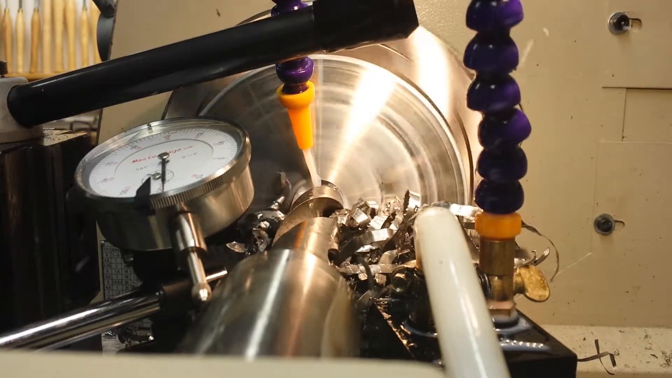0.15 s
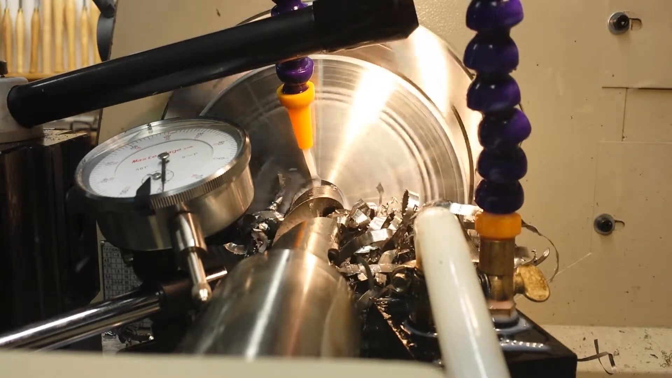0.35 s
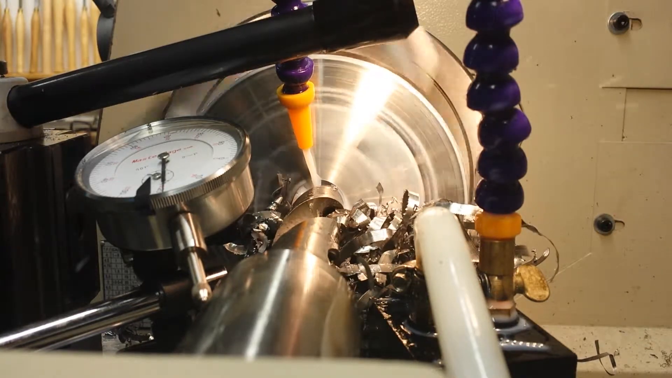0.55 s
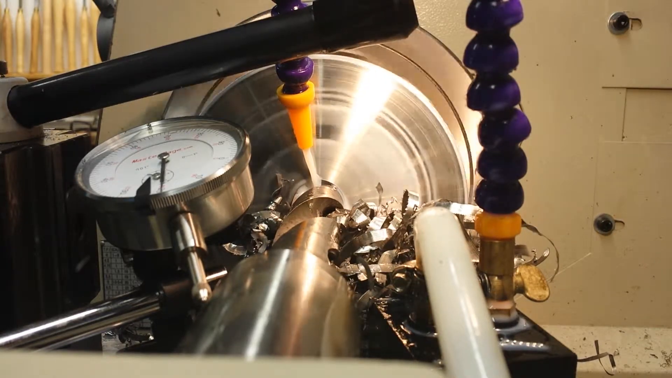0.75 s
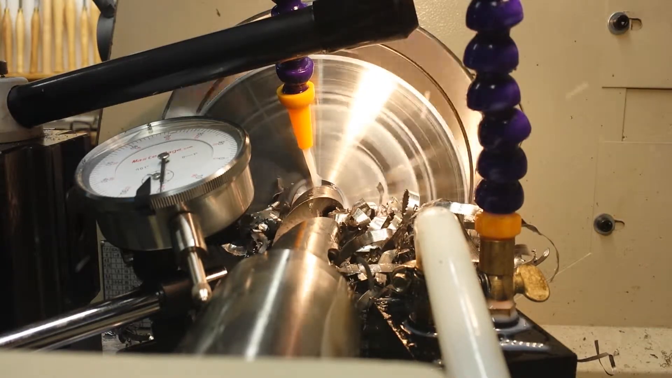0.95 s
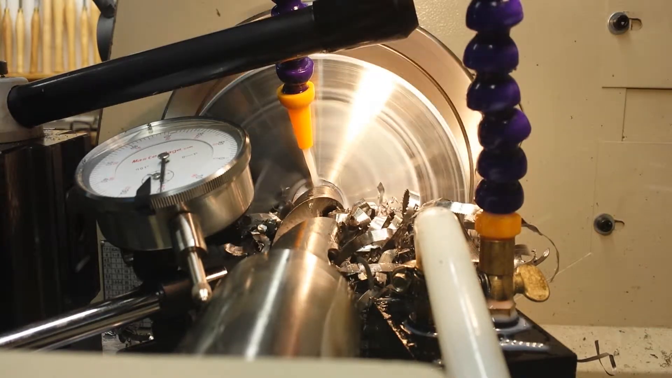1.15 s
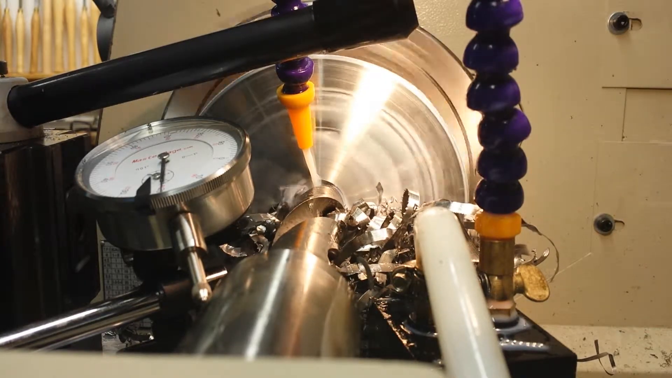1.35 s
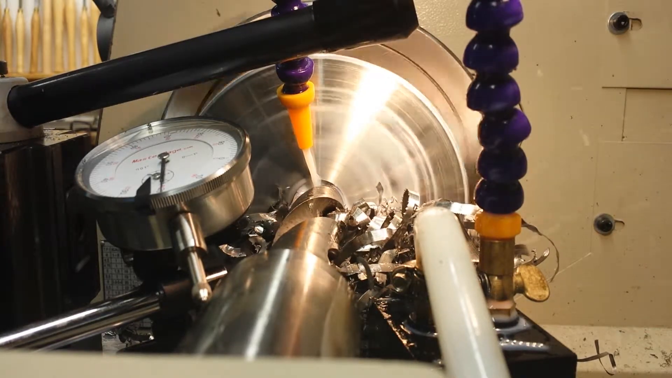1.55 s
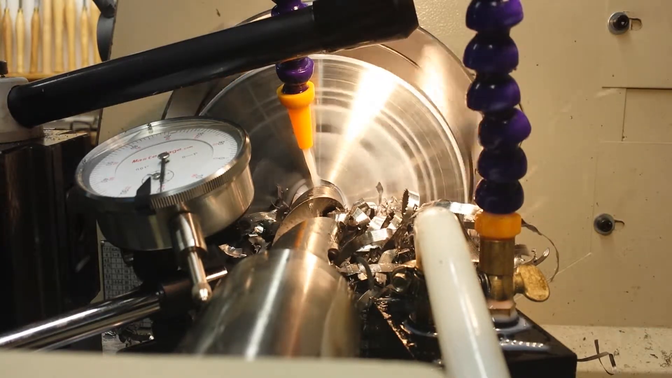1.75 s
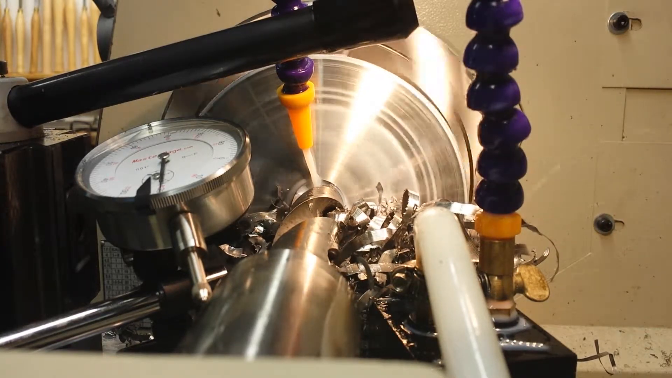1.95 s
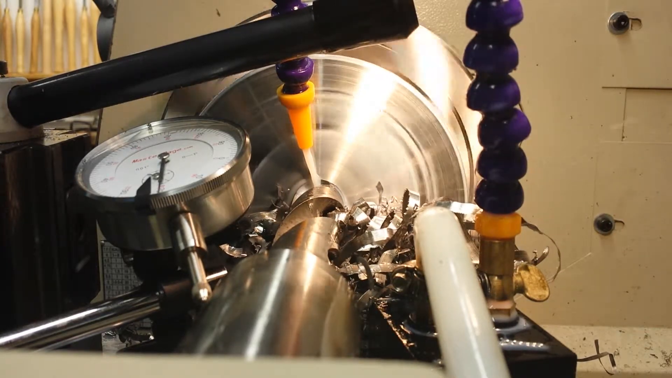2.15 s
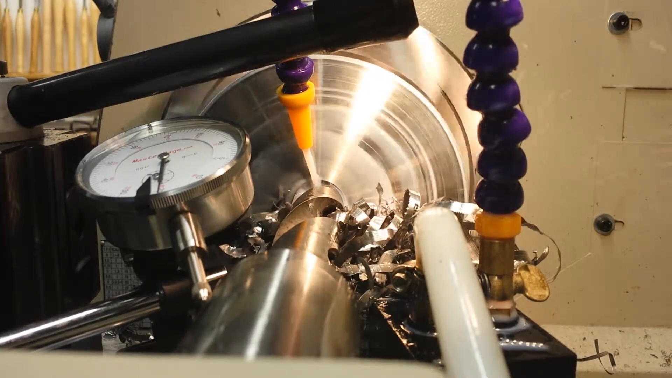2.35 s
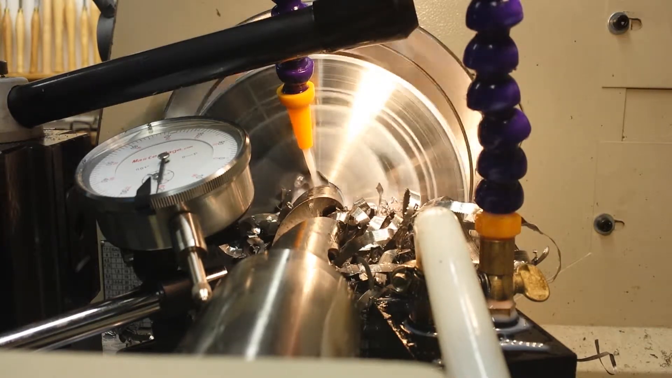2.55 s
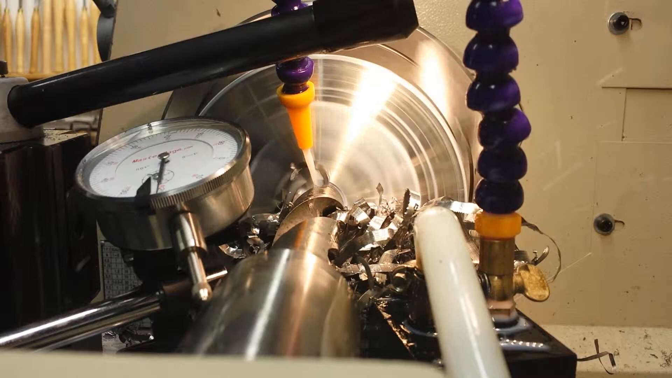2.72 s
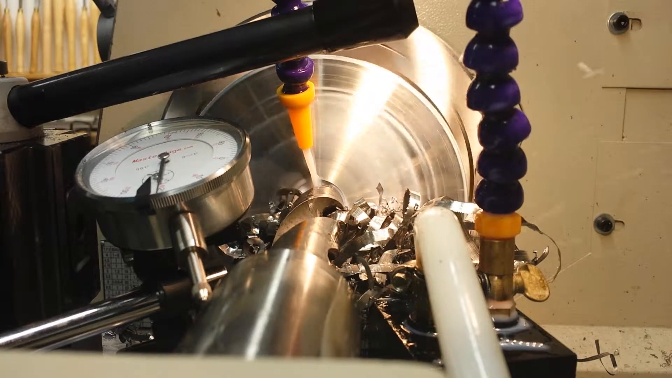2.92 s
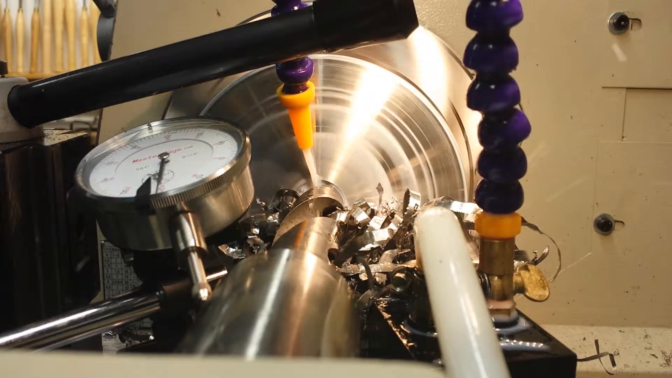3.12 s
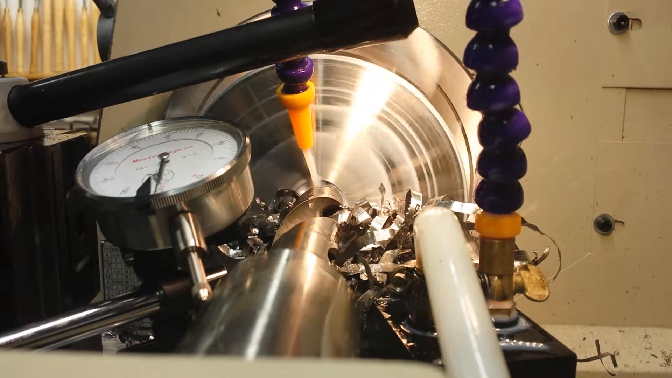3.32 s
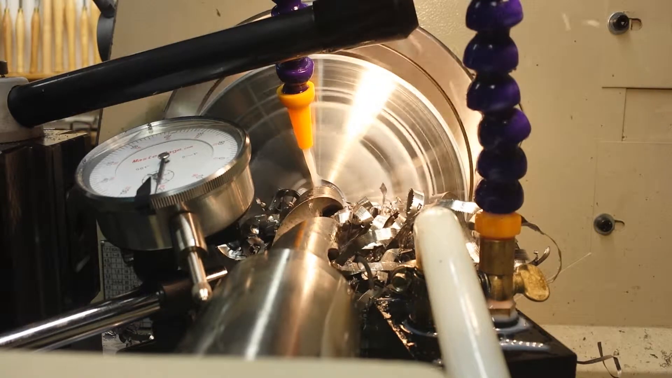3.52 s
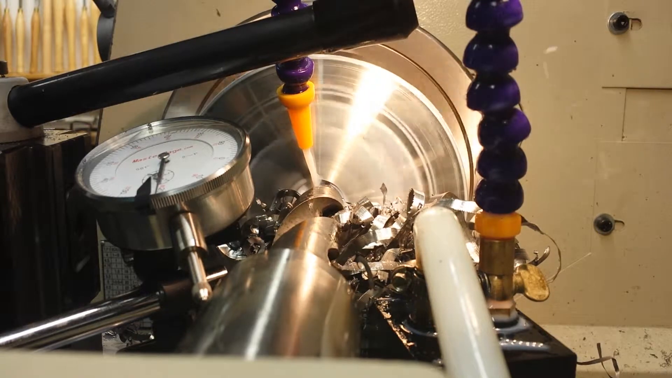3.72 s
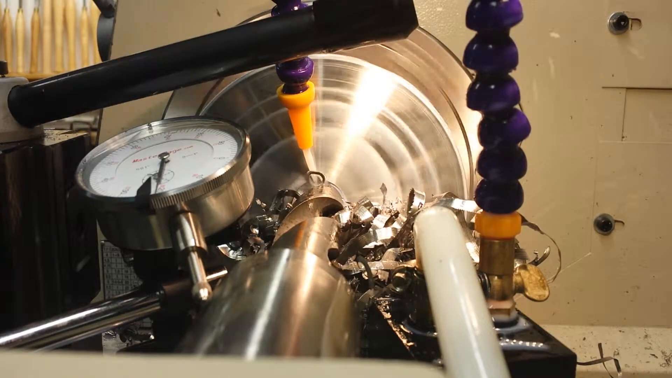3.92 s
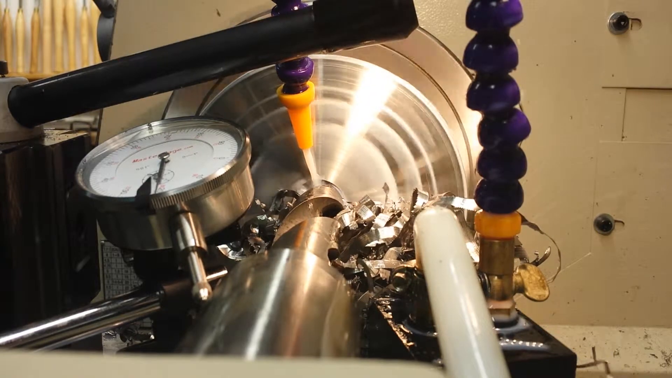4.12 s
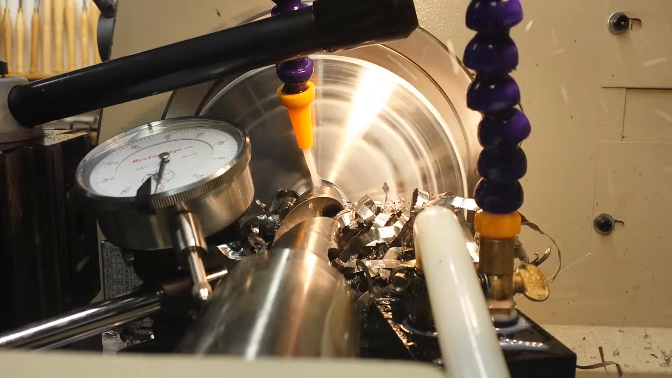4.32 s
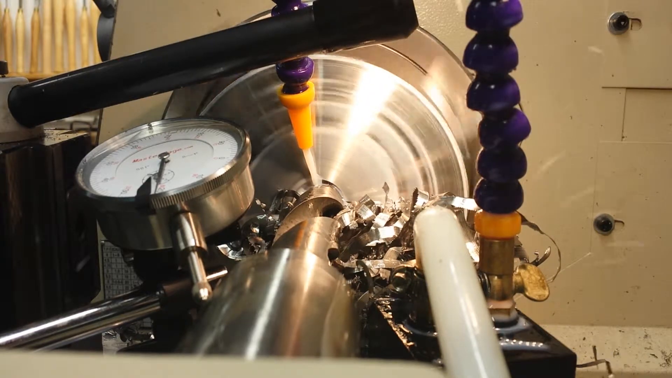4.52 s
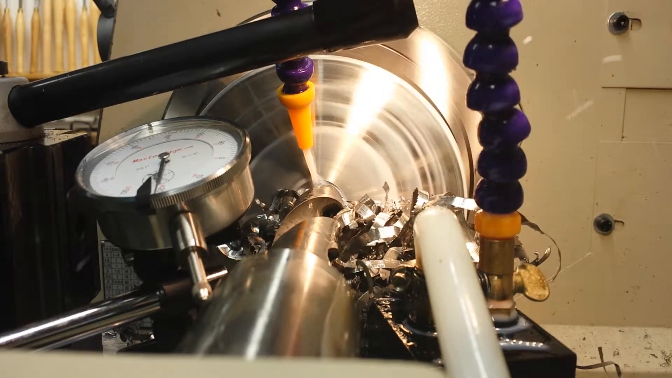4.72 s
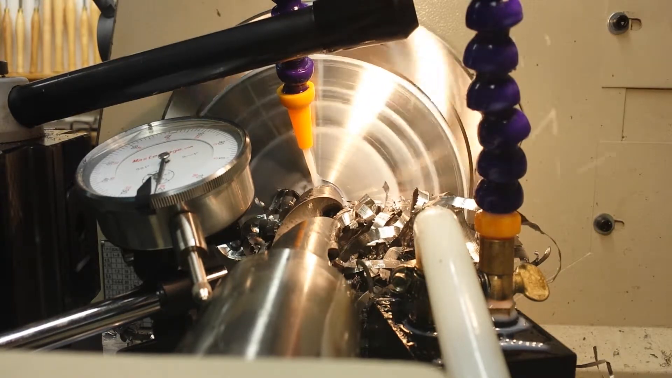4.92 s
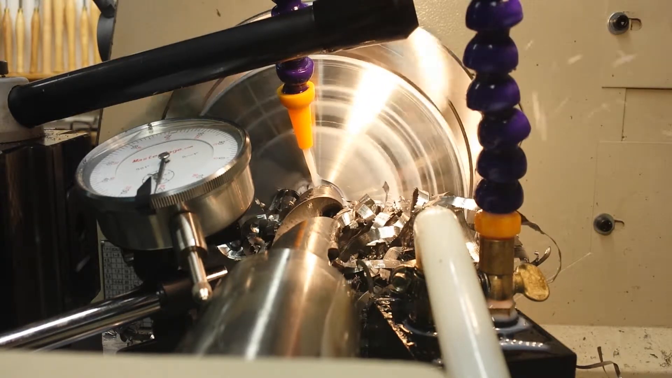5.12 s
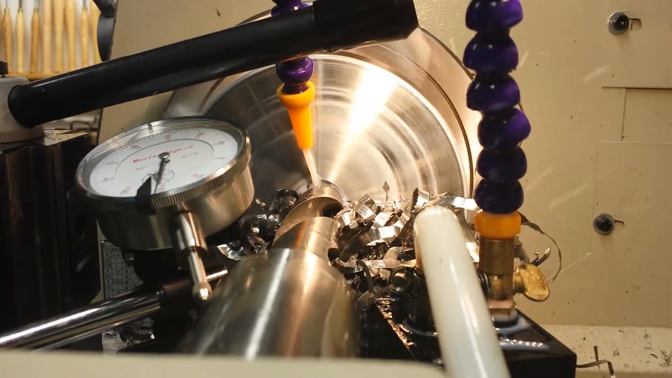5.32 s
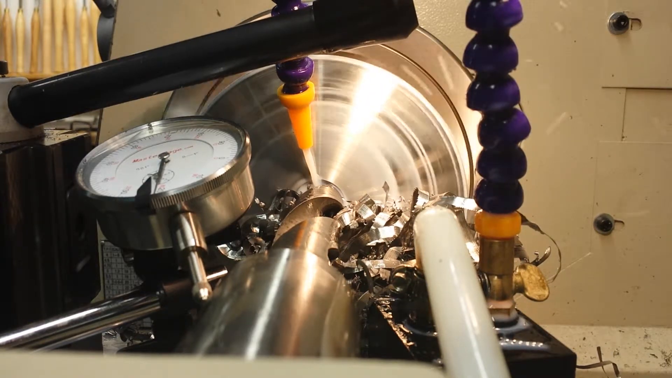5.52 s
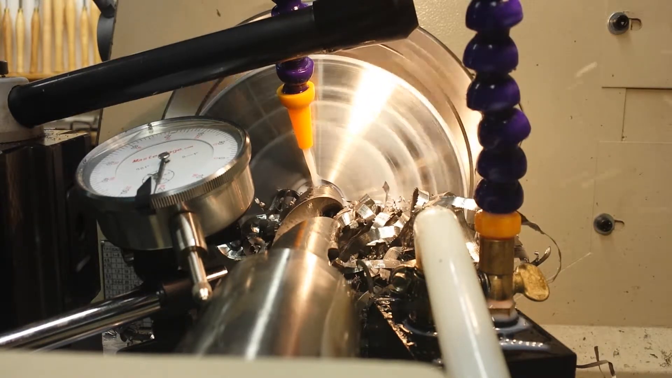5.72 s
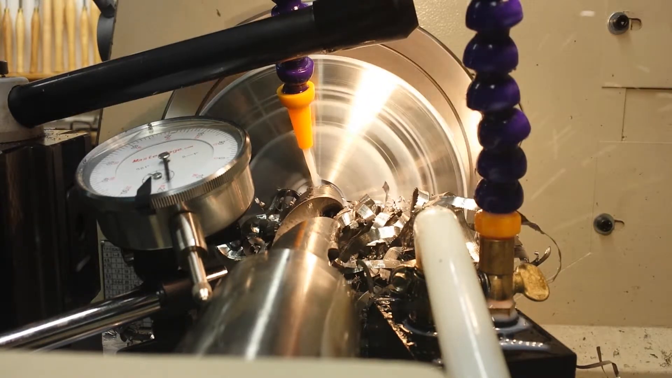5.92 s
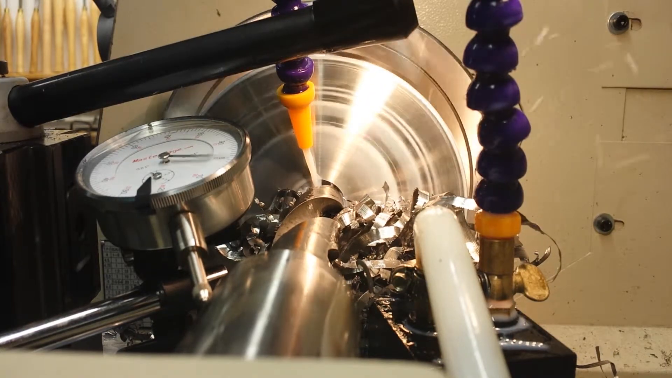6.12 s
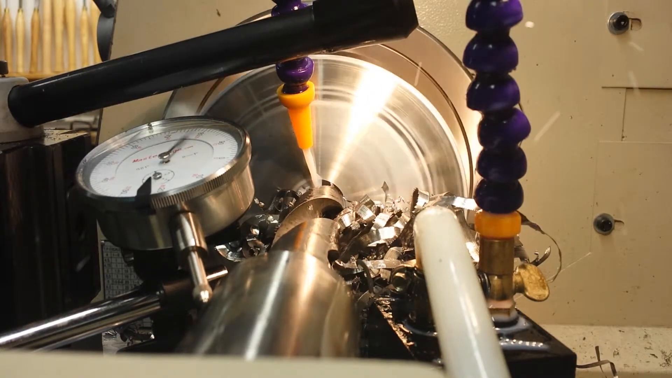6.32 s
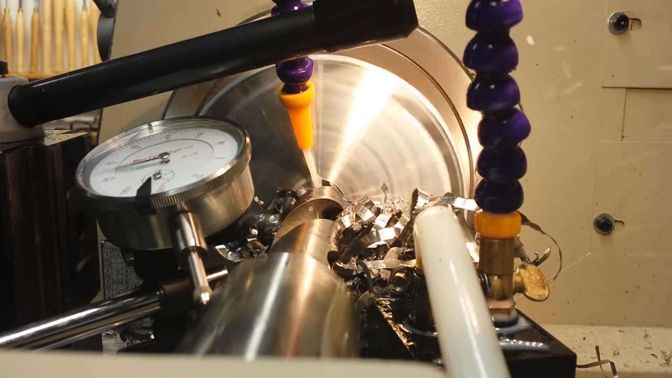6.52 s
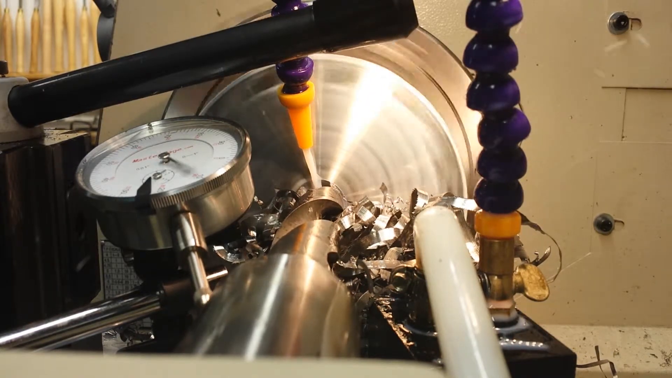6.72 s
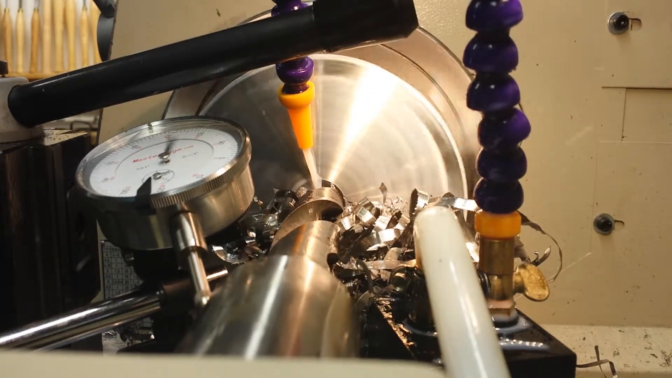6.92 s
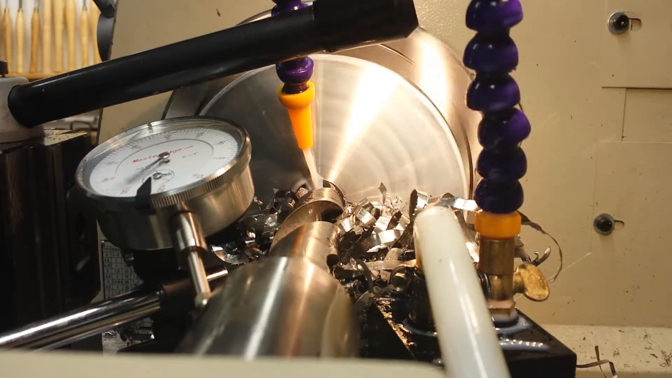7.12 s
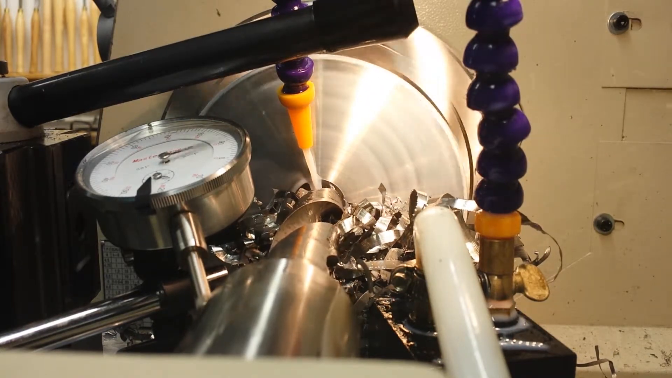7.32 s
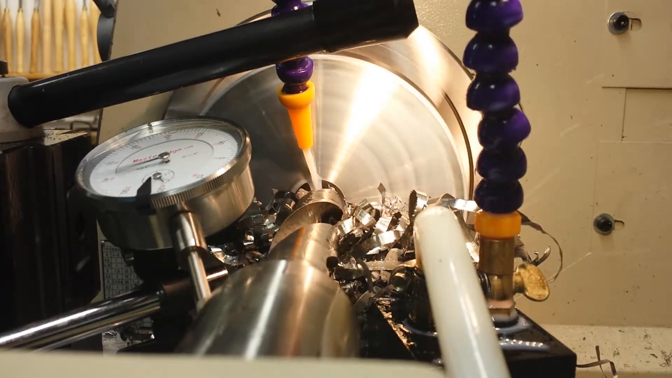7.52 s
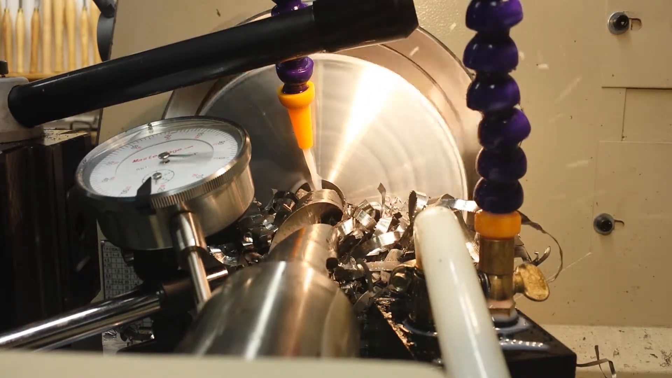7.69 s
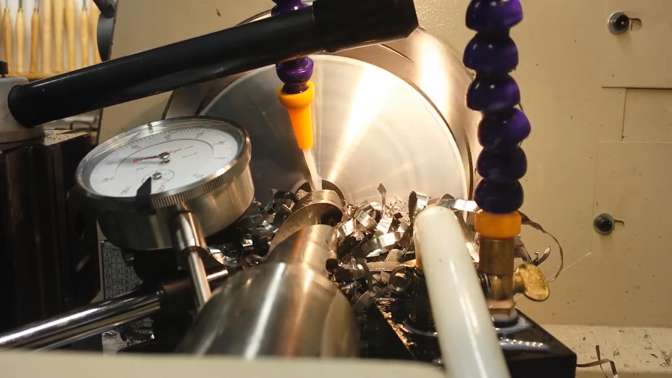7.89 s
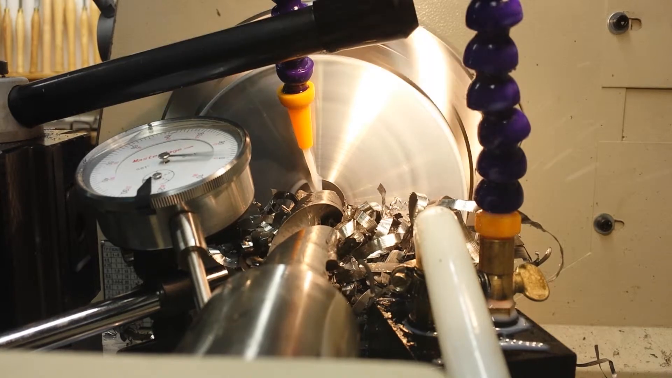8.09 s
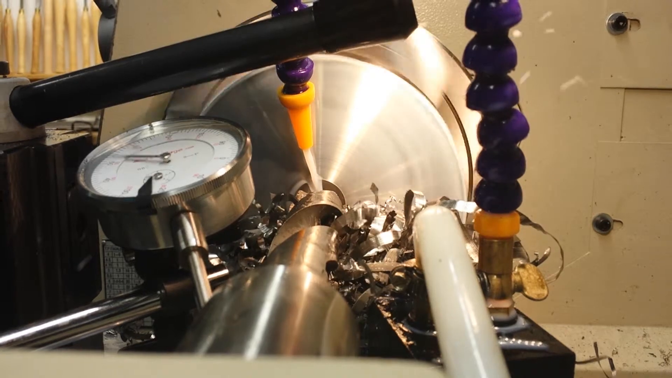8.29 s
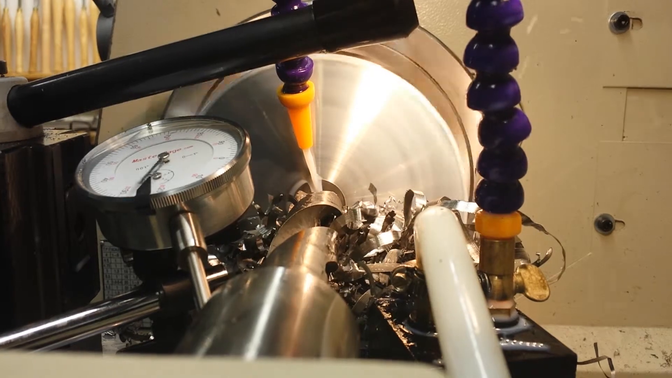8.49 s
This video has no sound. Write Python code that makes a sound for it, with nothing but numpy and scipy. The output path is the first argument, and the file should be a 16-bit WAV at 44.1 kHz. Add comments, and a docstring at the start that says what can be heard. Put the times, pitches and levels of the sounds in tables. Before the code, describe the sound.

A painfully shrill, fluttering drill screech with brief dropouts ends abruptly near six seconds; spraying coolant, low gear hum and small metallic ticks rise afterwards.

```python
"""A lathe drills steel under coolant, with two microphones close by. From the start the drill squeals near
7.5 kHz, as one steered sine that stalls and snaps back, over a cutting hiss and a low swelling rumble of noise.
The squeal is so loud that it overloads the microphones' input and pushes everything else down.
Near 6 s the feed stops and squeal and hiss end. The gain control then brings up the hum of motor and gears
(sines and noise) and the rush of coolant. Loose chips tick as decaying rings, and one long chip scrapes."""
import sys
import numpy as np
from scipy import signal
from scipy.fft import rfft, irfft, next_fast_len
from scipy.io import wavfile
from scipy.ndimage import uniform_filter1d, map_coordinates

SR = 44100
rng = np.random.default_rng(int(sys.argv[2]) if len(sys.argv) > 2 else 0)


def transcribe(u):
    """Save the signal u as a 16-bit wav file named by the first command-line argument.

    u: samples, shape (n,) or (channels, n), limited to [-1, 1]; the rate is SR.
    q: integer samples, one column per channel.
    """
    v = np.clip(np.atleast_2d(u).T, -1, 1)
    q = np.round(v * 32767).astype(np.int16)
    wavfile.write(sys.argv[1], SR, q)


N = 377055  # length in samples

# The two microphones. Each row: frequency in Hz, likeness of left and right (1 same, 0 unrelated, -1 opposite).
LIKENESS = [(60, -0.39), (130, 1), (290, 0.68), (640, 0.48), (1400, -0.1), (3070, 0.18), (6750, -0.088),
            (14800, 0.3)]
# Each row: frequency in Hz, left minus right level in dB.
LEFT_MINUS_RIGHT = [(60, -17), (110, -2), (200, 0), (380, 1.5), (690, -4), (1280, -1.5), (2360, -2.5),
                    (4360, -2), (8040, -7.5), (14800, -20.5)]

# How strong the squeal is when it is not stalled. Each row: time in seconds, level at the right
# microphone in dB, left minus right level in dB, phase between the microphones in radians.
SQUEAL_LEVEL = [(0, 5.5, -15, 3.86), (.7, 4, -10, 3), (.8, 9.5, -10, 3.88), (1.2, 6.5, -14.5, 3.4),
                (1.35, 10, -8.5, 4.57), (1.5, 0, -6, 3.9), (1.9, 5.5, -12.5, 3.4), (2.1, 2, -6, 3.04),
                (2.3, 6.5, -8.5, 3.05), (2.65, 3.5, -5, 3.22), (3.05, 4, -5.5, 2.27), (3.28, 6.5, -6, 3.75),
                (3.41, 5, -2, 2.06), (3.55, 3.5, -7, 2.63), (4.2, 5, 0, 3.02), (4.3, 12, -2.5, 1.84),
                (4.4, 7.5, -4.5, 2.4), (4.48, 4.5, -7.5, 3), (4.6, 4, -11, 2.2), (4.68, 6, -15.5, 6.4),
                (4.78, 6, -7.5, 2.73), (5.05, 4, -8.5, 3.3), (5.48, 4, -9, 3.63), (5.72, -5, -4, 2.76),
                (5.83, -34.5, -14.5, 3), (6.0, -73, -10, 3)]
# The squeal stalls while the lips cut smoothly. Each row: start in seconds, end in seconds, depth in dB.
SQUEAL_STALLS = [(0.252, 0.349, -19), (0.39, 0.615, -31.5), (0.648, 0.741, -21), (0.99, 1.143, -9),
                 (1.366, 1.417, -33.5), (1.516, 1.644, -37), (1.72, 1.813, -7), (2.868, 3.08, -7),
                 (4.945, 5.35, -7), (5.529, 5.679, -23)]
# Centre pitch of the squeal. Each row: time in seconds, pitch in Hz.
SQUEAL_PITCH = [(0.0, 7395), (0.23, 7565), (0.27, 7430), (0.47, 7625), (0.79, 7405), (1.26, 7440),
                (1.39, 7320), (1.44, 7440), (1.83, 7565), (1.91, 7400), (1.98, 7500), (2.33, 7555),
                (2.85, 7515), (3.07, 7580), (3.2, 7455), (3.59, 7555), (4.21, 7500), (4.25, 7560),
                (4.63, 7495), (5.41, 7560), (5.47, 7465), (5.79, 7570)]
# Flutter of the squeal. Each row: random changes per second, depth as a fraction of the swing.
SQUEAL_FLUTTER = [(110, .27), (240, .14), (600, .045)]
# A chip breaks and the squeal jumps in level (mostly a collapse), then snaps back. Each row: time of the
# snap in seconds, level change before it in dB, phase kick in radians.
CHIP_BREAKS = [(.375, -13, 0.34), (1.442, -16, 0.24), (1.693, -60, .3), (2.799, -2, 2.2), (2.86, -19, 6.2),
               (3.369, 5, 0.89), (3.951, -2, 1.4), (4.003, 7, 0.67), (4.067, -11, 0.55), (4.133, -25, 1.2),
               (4.156, -10, 1.6), (4.21, -19, 2.8), (4.824, -25, 0.25), (5.12, -60, 0.28)]

# How hard the lips cut. Each row: time in seconds, level of the hiss in dB.
FEED_LEVEL = [(0, -34.5), (1.2, -34.5), (1.7, -33), (2.2, -33.5), (2.9, -36), (3.4, -34.5), (4.3, -35),
              (4.7, -36), (5.1, -34), (5.6, -36), (5.8, -34.5), (5.92, -40), (6.02, -59), (6.3, -82)]
# Colour of the cutting hiss. Each row: frequency in Hz, relative level in dB per Hz.
CUT_COLOUR = [(820, -27), (1400, -99), (1620, -9.5), (2590, -7.5), (3910, -3.5), (4660, -4.5), (5780, -2.5),
              (7030, 0.5), (7600, 6), (8060, -4.5), (14500, -87)]
# Drill and workpiece ring. Each row: frequency in Hz, width in Hz, relative level in dB.
TOOL_MODES = [(1644, 5.4, 6), (2945, 55, -11), (3462, 48, -1.5), (3960, 38, 4), (4256, 110, -4.5),
              (5070, 69, 0), (6550, 300, -2.5), (9570, 130, -5.5)]
# The tailstock groans under the feed. Each row: frequency in Hz, width in Hz, relative level in dB.
TAILSTOCK_MODES = [(173, 10, 4.5), (332, 40, -2.5), (533, 122, -2)]

# Level of the headstock, mostly lower while the drill cuts. Each row: time in seconds, rumble level in dB.
HEADSTOCK_LEVEL = [(0, -49), (.55, -43), (1.1, -48.5), (1.6, -43.5), (2.3, -50), (2.95, -47), (3.6, -50.5),
                   (4.6, -48), (5.3, -46.5), (5.8, -41), (6.3, -40.5), (7.0, -41.5), (7.8, -41),
                   (8.55, -38.5)]
# Motor and gear tones. Each row: frequency in Hz, relative level in dB.
GEAR_TONES = [(120.1, -42.5), (172, -40.5), (226.5, -39), (239.5, -42), (253, -60), (480.1, -34.5),
              (600, -48.5), (705.9, -50), (783.7, -46), (834.8, -72), (1017, -48.5), (1137.1, -39.5),
              (1257.1, -47.5)]
# Colour of the headstock rumble. Each row: frequency in Hz, relative level in dB per Hz.
RUMBLE_COLOUR = [(25, -27), (76, -16), (110, -7.5), (140, -8.5), (165, -0.5), (215, 4), (250, 5.5),
                 (280, -4), (450, -6.5), (530, -4), (630, -14), (950, -9.5), (1500, -17.5), (3000, -43)]
# Colour of the coolant rush. Each row: frequency in Hz, relative level in dB per Hz.
RUSH_COLOUR = [(410, -37), (700, -2), (836, -3), (949, 0), (1080, -4), (1160, 2), (1440, -2), (2680, -4.5),
               (3010, -4.5), (6360, -6.5), (7890, -2), (9790, -14), (11400, -12.5), (13800, -30.5),
               (14500, -23.5)]
# Chuck and guard ring under the spray. Each row: frequency in Hz, width in Hz, relative level in dB.
GUARD_MODES = [(974, 35, 8), (1245, 25, 1), (2945, 41, 7.5), (3220, 330, -7.5), (4000, 200, -2),
               (6660, 200, -5), (7560, 110, -7), (11150, 140, -21)]

# Chips striking steel. Each row: time in seconds, strength in dB, the chip's own ring in Hz.
CHIP_STRIKES = [(6.428, -15.5, 8440), (6.556, -22, 8320), (6.834, -20.5, 8160), (6.92, -32, 7200),
                (6.9612, -20.5, 7960), (7.197, -20.5, 8000), (7.289, -26.5, 8280), (7.312, -27, 7200),
                (7.3656, -21.5, 5700), (7.587, -22, 1350), (7.727, -28.5, 7800), (7.767, -23, 5800),
                (8.031, -23.5, 9100), (8.237, -28, 8250), (8.2688, -23, 9300), (8.4663, -25.5, 7830)]
# What they ring with. Each row: frequency in Hz, relative level in dB, time to fall by 60 dB in seconds.
STEEL_MODES = [(1430, -4.5, .04), (3140, -6, 0.049), (4380, -18, .04), (5900, -12, 0.023),
               (7270, -0.5, 0.059), (7420, -10.5, 0.057), (7990, 0, 0.076), (8300, -3.5, 0.056)]
# A long chip drags along the chuck. Each row: time in seconds, pitch in Hz, level in dB.
CHIP_SCRAPE = [(7.36, 3220, -90), (7.39, 3490, -46), (7.44, 3940, -40), (7.49, 4800, -40),
               (7.53, 4800, -90)]

FALL_S, REGROW_S = 0.049, 0.035  # how long the squeal takes to die into a stall and to grow back
# Left minus right level in a stall, and the stall depth at which it is reached.
STALL_BALANCE_DB, STALL_SHIFT_DB = -11.5, 5
TURN_WANDER_RAD = 0.31  # random wander of the phase between the microphones
SWELL_DB, SWELL_GROWS = -47, 1.6  # low rumble when the left squeal is at 0 dB, and dB more per dB of squeal
RUSH_DB = -40.5  # coolant and chuck
TONES_DB = 32  # gain of the gear tones over the headstock level
LIMIT_KNEE_DB, LIMIT_SLOPE, LIMIT_S = -18.5, .14, 0.13  # threshold, dB of cut per dB over it, averaging time
CEILING, CONVERTER_HZ, TOP_HZ = .745, 48000, 14650  # clipping level, converter rate, highest frequency kept
# After a loud moment (level over LOUD) the gain waits, rises fast, then creeps on.
# It follows the lower of two lines: a fast one from 0 dB and a slow one from CREEP_FROM_DB.
LOUD, HOLD_S, RISE_DB_PER_S, CREEP_FROM_DB, CREEP_DB_PER_S = .15, 0.64, 19.5, 9.5, 2


def amp(db):
    """Turn decibels into a gain."""
    return 10 ** (np.asarray(db) / 20)


def along(points, hz):
    """Read a curve of (Hz, value) points on a log frequency axis."""
    f, v = np.transpose(points)
    return np.interp(np.log(hz + 1), np.log(f + 1), v)


def curves(rows):
    """Give one value per sample for each column after the time."""
    s, *cols = np.transpose(rows)
    return [np.interp(np.arange(N) / SR, s, c) for c in cols]


def wobble(rate):
    """Draw a smooth random curve with this many random points per second."""
    points = rng.standard_normal(int(N * rate / SR) + 4)
    return map_coordinates(points, [np.arange(N) * rate / SR])


def filtered(x, response):
    """Filter x by a response that depends on frequency."""
    m = next_fast_len(N + SR // 2)
    hz = np.fft.rfftfreq(m, 1 / SR)
    return irfft(rfft(x, m) * response(hz), m)[..., :N]


def resonances(modes, f):
    """Add up the peaks of ringing parts, with alternating signs."""
    total = 0
    for k, (centre, width, db) in enumerate(modes):
        damping = 1j * f * width
        total = total + (-1) ** k * amp(db) * damping / (centre * centre - f * f + damping)
    return total


def half_apart(hz):
    """Half the angle between left and right; its cosine, when doubled, is their likeness."""
    return np.arccos(np.clip(along(LIKENESS, hz), -1, 1)) / 2


def placed(x):
    """The microphones hear each frequency at different levels; half the difference goes to each."""
    return filtered(x, lambda hz: amp(np.array([[.5], [-.5]]) * along(LEFT_MINUS_RIGHT, hz)))


def noise(colour):
    """Coloured stereo noise: a shared and an opposed part set its likeness; its average of sides has rms 1."""
    def split(hz):
        return colour(hz) * np.array([np.cos(half_apart(hz)), np.sin(half_apart(hz))])

    mid, side = filtered(rng.standard_normal((2, N)), split)
    pair = placed(np.array([mid + side, mid - side]))
    return pair / np.std(pair.mean(axis=0))


def squeal_course():
    """The squeal dies into each stall and grows back: gives left and right dB and the phase between them."""
    t = np.arange(N) / SR
    free_db, balance_db, turn = curves(SQUEAL_LEVEL)
    stall_db = np.zeros(N)
    for start, end, depth in SQUEAL_STALLS:
        falling = (t - start) / FALL_S
        regrowing = 1 - (t - end) / REGROW_S
        stall_db += depth * np.clip(np.minimum(falling, regrowing), 0, 1)
    stalled = np.clip(-stall_db / STALL_SHIFT_DB, 0, 1)
    right_db = free_db + stall_db
    left_db = right_db + balance_db + stalled * (STALL_BALANCE_DB - balance_db)
    return left_db, right_db, turn


def squeal(left_db, right_db, turn, jitter_hz, lock, dip_s, kick_s):
    """A steered sine with random flutter; the listed chip breaks shake its strength and phase."""
    t = np.arange(N) / SR
    # The louder the squeal, the less it wobbles: it becomes one steadier tone.
    loose = np.interp(right_db, [-10, 5, 14], [1, .9, lock])
    pitch = curves(SQUEAL_PITCH)[0] + loose * (jitter_hz * wobble(45) + 16 * wobble(14))
    phase = 2 * np.pi * np.cumsum(pitch) / SR
    turn = turn + TURN_WANDER_RAD * (loose * wobble(20) + 0.73 * wobble(70))

    def shake(rate):
        # Complex, so it shakes strength and phase together.
        return loose * (wobble(rate) + 1j * wobble(rate))

    flutter = 1 + sum(depth * shake(rate) for rate, depth in SQUEAL_FLUTTER)
    swing = amp(1.93 * loose * wobble(90) + .8 * loose * wobble(22)) * flutter
    for s, dip_db, kick in CHIP_BREAKS:
        swing *= amp(np.interp(t - s, [-2 * dip_s, -dip_s, -.002, .003], [0, dip_db, dip_db, 0]))
        turn = turn - np.interp(t - s, [-.001, .003, kick_s], [0, kick, 0])
    # Reflections from the machine reach each microphone differently.
    left = amp(left_db + 3.3 * loose * wobble(30)) * (1 + 0.33 * shake(90)) * np.exp(1j * turn)
    right = amp(right_db) * (1 + .2 * shake(130))
    return np.real(np.array([left, right]) * swing * np.exp(1j * phase))


def cutting(ring_db, groan_db, grain_db):
    """The lips shear the steel: a grainy hiss that also rings drill, workpiece and tailstock."""
    hiss = noise(lambda hz: amp(along(CUT_COLOUR, hz)))
    ring = amp(ring_db) * noise(lambda hz: resonances(TOOL_MODES, hz))
    groan = amp(groan_db + wobble(6.9)) * noise(lambda hz: resonances(TAILSTOCK_MODES, hz))
    level_db = curves(FEED_LEVEL)[0] + 1.3 * wobble(24.95) + grain_db * wobble(400)
    return (hiss + ring + groan) * amp(level_db)


def swelling_rumble(squeal_db):
    """Low rumble of noise that swells under the loudest squeal, growing faster than the squeal does."""
    colour = [(25, -31), (60, -4.5), (120, -8), (260, -32), (900, -87)]  # Hz, relative dB per Hz
    rumble = noise(lambda hz: amp(along(colour, hz)))
    return amp(SWELL_DB + SWELL_GROWS * squeal_db) * rumble


def headstock(waver_rad):
    """Motor and gears hum: slightly wavering sines over a low rumble of noise."""
    t = np.arange(N) / SR
    tones = np.zeros((2, N))
    for hz, db in GEAR_TONES:
        phase = 2 * np.pi * (hz * t + rng.random()) + waver_rad * wobble(5.2)
        apart = half_apart(hz)
        tones += amp(db + 1.4 * wobble(12)) * np.sqrt(2) * np.sin([phase + apart, phase - apart])
    rumble = noise(lambda hz: amp(along(RUMBLE_COLOUR, hz)))
    return amp(curves(HEADSTOCK_LEVEL)[0]) * (rumble + amp(TONES_DB) * placed(tones))


def walls(hz, strength, count=8):
    """Close metal walls add early echoes that ripple the spectrum."""
    delays = rng.uniform(.001, .015, count)  # seconds
    return 1 + strength * sum(np.exp(-2j * np.pi * hz * d) for d in delays)


def coolant(guard_db, spatter_db):
    """The spinning chuck throws coolant against the guard: spattering noise that rings the metal."""
    rush = noise(lambda hz: amp(along(RUSH_COLOUR, hz)) * walls(hz, strength=0.15))
    guard = amp(guard_db) * noise(lambda hz: resonances(GUARD_MODES, hz))
    return amp(RUSH_DB + 0.57 * wobble(14) + spatter_db * wobble(600)) * (rush + guard)


def chips(ring_db, own_db, crack_db, crack_t60):
    """Each flung chip gives a crack, rings at its own pitch and rings the steel at new strengths."""
    t = np.arange(SR // 6) / SR
    out = np.zeros((2, N + len(t)))
    hz, mode_db, t60 = np.transpose(STEEL_MODES)[:, :, None]
    for s, db, own_hz in CHIP_STRIKES:
        strength = amp(mode_db + 2 * rng.standard_normal(hz.shape) - 60 * t / t60)
        start_turns = rng.random((2, len(hz), 1))
        ring = (strength * np.sin(2 * np.pi * (hz * t + start_turns))).sum(axis=1)
        own = amp(own_db - 60 * t / 0.028) * np.sin(2 * np.pi * own_hz * t)
        crack = amp(crack_db - 60 * t / crack_t60) * rng.standard_normal((2, len(t)))
        first = round(s * SR)
        out[:, first:first + len(t)] += amp(db) * (amp(ring_db) * ring + own + crack)
    colour = [(500, -4), (1300, 1.0), (8500, 7.0), (11000, -16)]  # Hz, dB
    return placed(filtered(out[:, :N], lambda hz: amp(along(colour, hz))))


def scrape(width_hz):
    """The dragging chip shortens, so its rough whistle rises."""
    pitch, db = curves(CHIP_SCRAPE)
    rub = np.array([wobble(width_hz) + 1j * wobble(width_hz) for _ in range(2)])
    return amp(db) * np.real(rub * np.exp(2j * np.pi * np.cumsum(pitch) / SR))


def scene():
    """Add up squeal, cut, swelling rumble, running machine and chips."""
    left_db, right_db, turn = squeal_course()
    drill = squeal(left_db, right_db, turn, jitter_hz=11, lock=0.42, dip_s=0.0032, kick_s=0.011)
    cut = cutting(ring_db=-3.5, groan_db=-9.0, grain_db=0.5)
    machine = headstock(waver_rad=0.25) + coolant(guard_db=-10.0, spatter_db=1.0)
    swarf = chips(ring_db=-15, own_db=-12.0, crack_db=-5, crack_t60=0.032) + scrape(width_hz=1400)
    return drill + cut + swelling_rumble(left_db) + machine + swarf


def limiter(x):
    """A loud squeal quickly pushes the whole sound down."""
    power = uniform_filter1d((x ** 2).max(axis=0), max(int(LIMIT_S * SR), 1))
    level_db = 10 * np.log10(2 * np.abs(power) + 1e-12)
    return x * amp(-LIMIT_SLOPE * np.maximum(level_db - LIMIT_KNEE_DB, 0))


def overload(x, top, leak_db):
    """The input clips; some overtones leak past the converter's filter and fold down as faint whistles."""
    fast = signal.resample_poly(x, 4 * CONVERTER_HZ, SR, axis=1)
    clipped = np.clip(fast, -top, top)
    sampled = signal.resample_poly(clipped, 1, 4, axis=1, window=("kaiser", 8))
    folded = clipped[:, ::4] - sampled  # what skipping the filter would add
    return signal.resample_poly(sampled + amp(leak_db) * folded, SR, CONVERTER_HZ, axis=1)[:, :N]


def gain_control(x):
    """Any loud moment holds the gain down; it rises once the sound stays quieter."""
    t = np.arange(N) / SR
    level = uniform_filter1d(np.abs(x).max(axis=0), size=441)  # averaged over 10 ms
    last_loud = np.maximum.accumulate(t * (level > LOUD))
    free_s = np.maximum(t - last_loud - HOLD_S, 0)
    fast_db = RISE_DB_PER_S * free_s
    slow_db = CREEP_FROM_DB + CREEP_DB_PER_S * free_s
    return x * amp(np.minimum(fast_db, slow_db))


def record(dry):
    """Apply limiter, overload and gain control, then remove everything from TOP_HZ up."""
    clipped = overload(limiter(dry), CEILING, leak_db=-14.5)
    return filtered(gain_control(clipped), lambda hz: hz < TOP_HZ)


dry = scene()
out = record(dry)
transcribe(out)
```